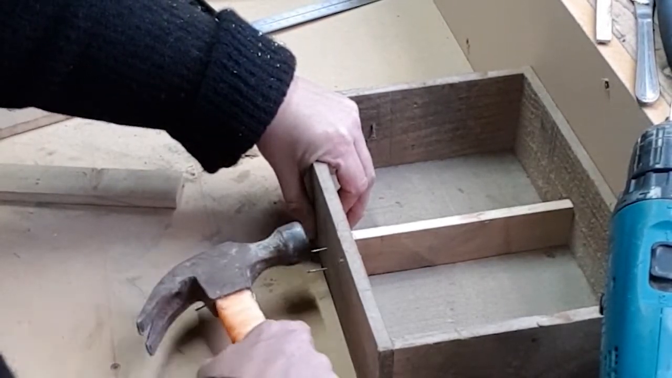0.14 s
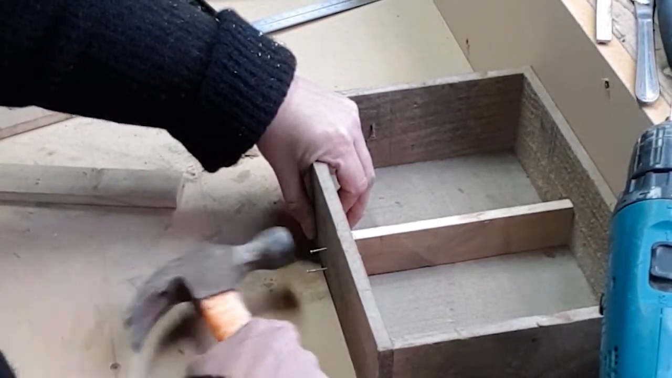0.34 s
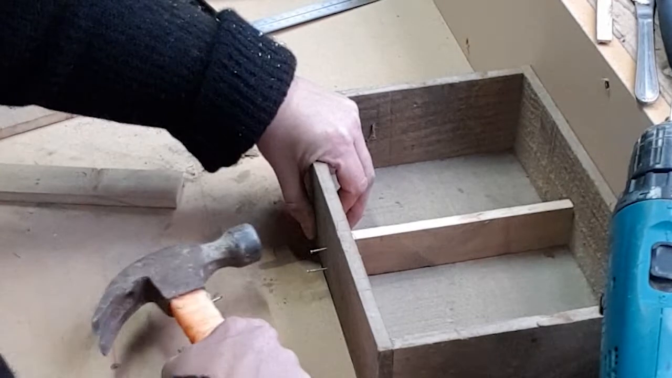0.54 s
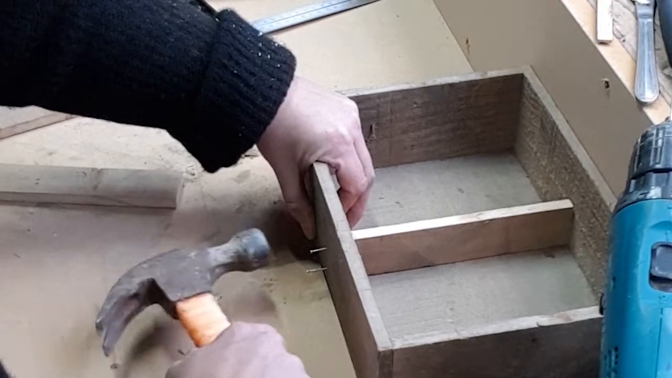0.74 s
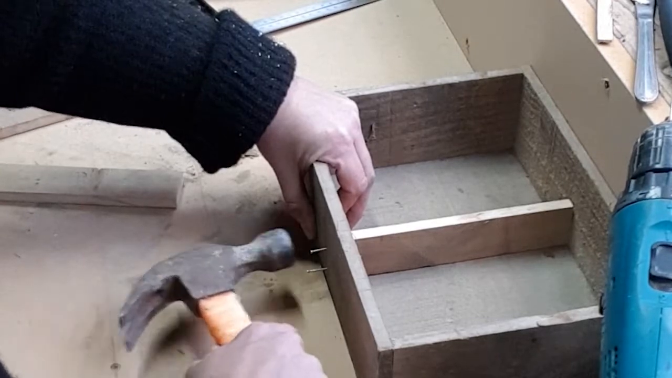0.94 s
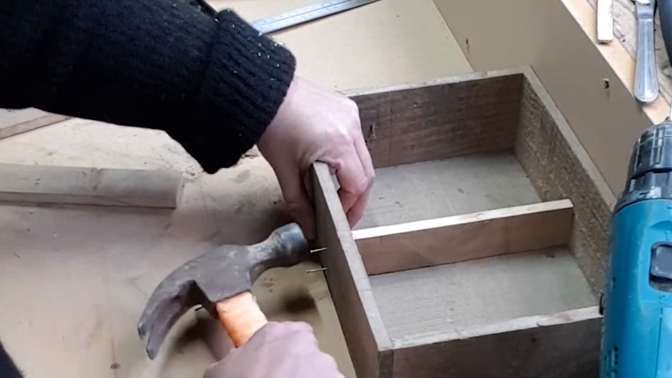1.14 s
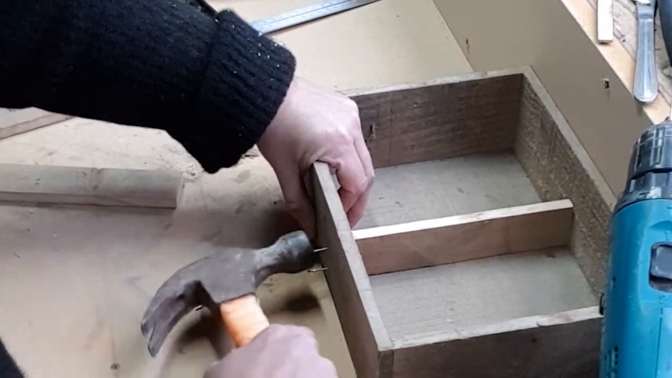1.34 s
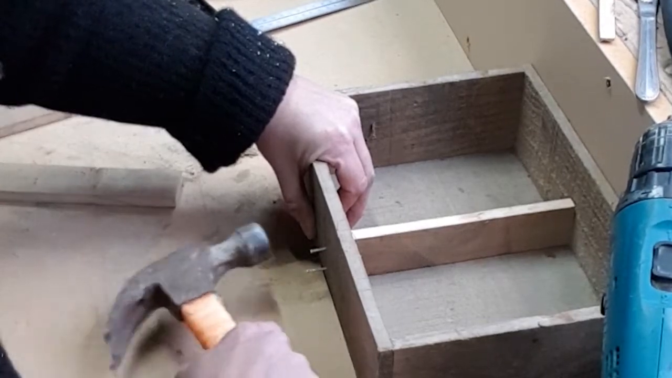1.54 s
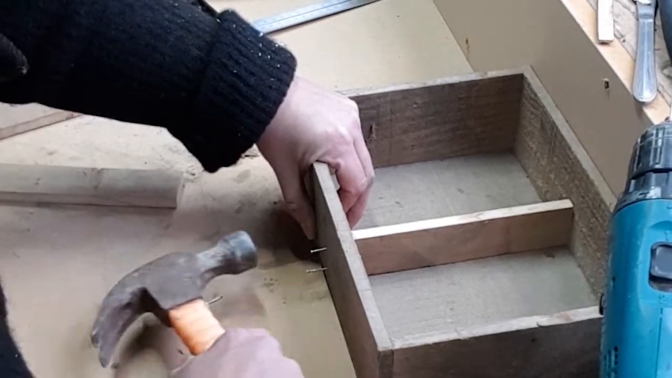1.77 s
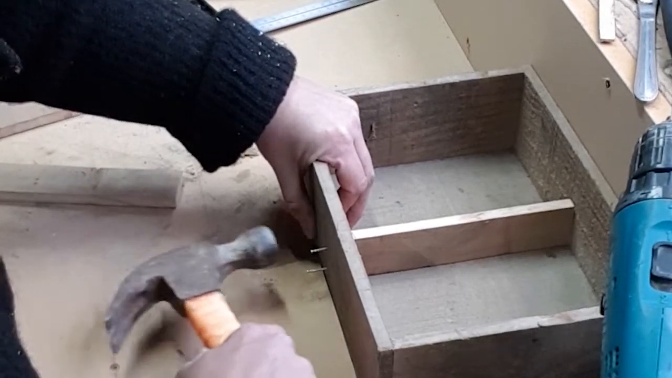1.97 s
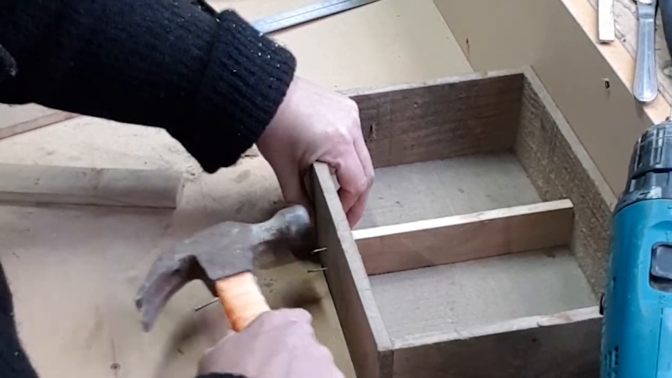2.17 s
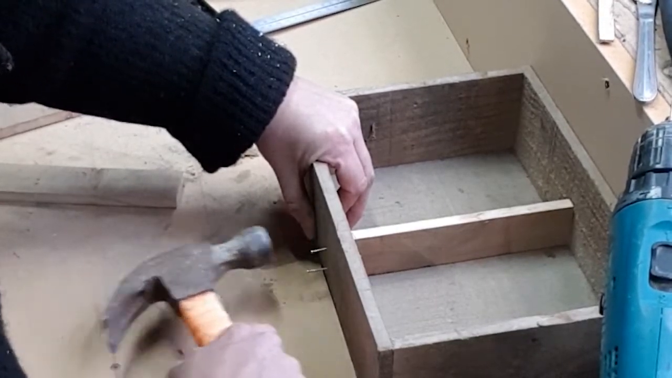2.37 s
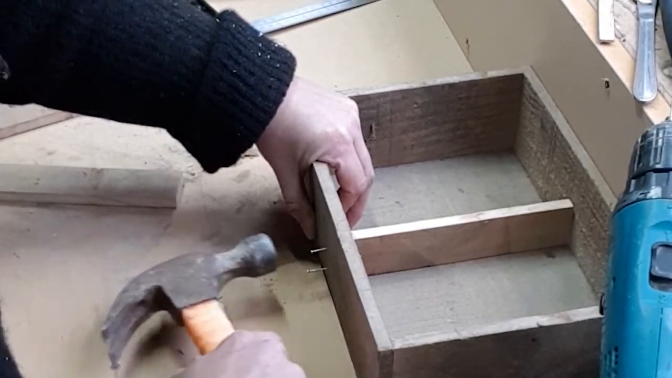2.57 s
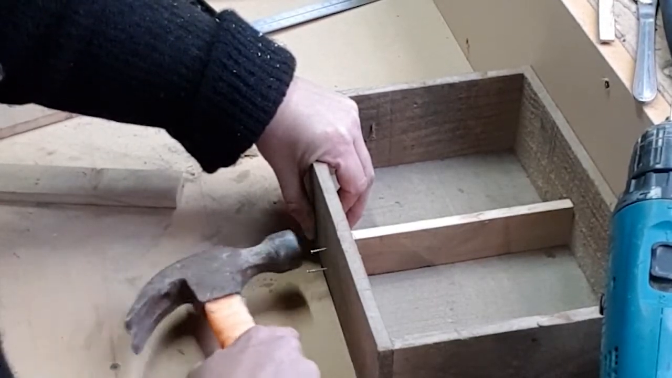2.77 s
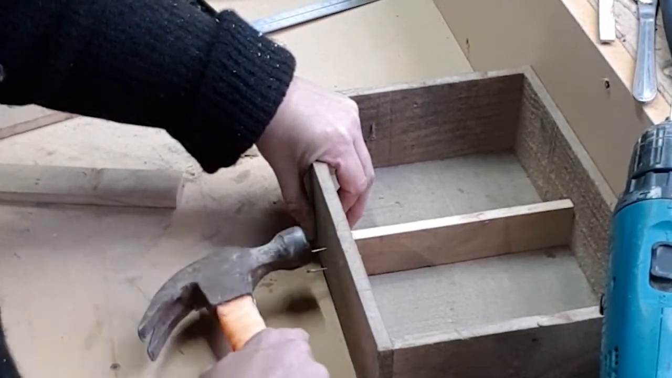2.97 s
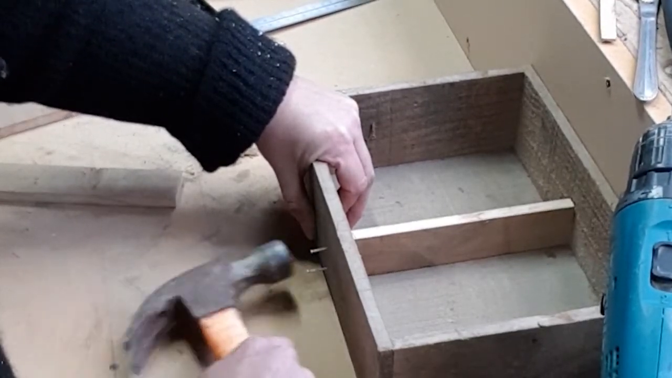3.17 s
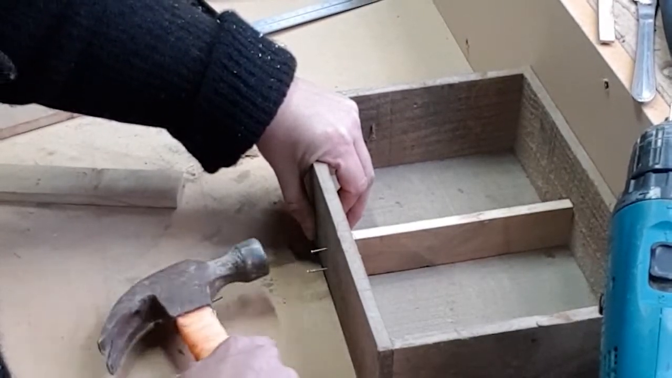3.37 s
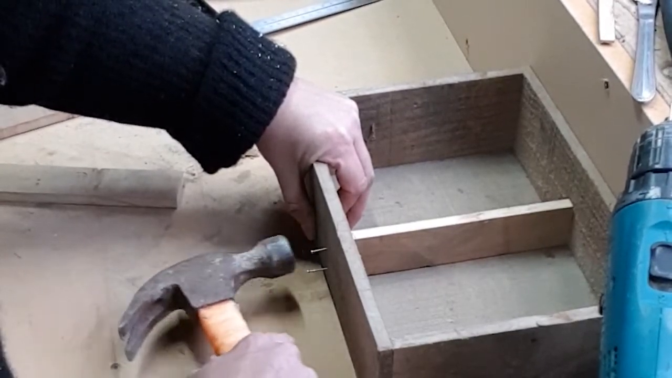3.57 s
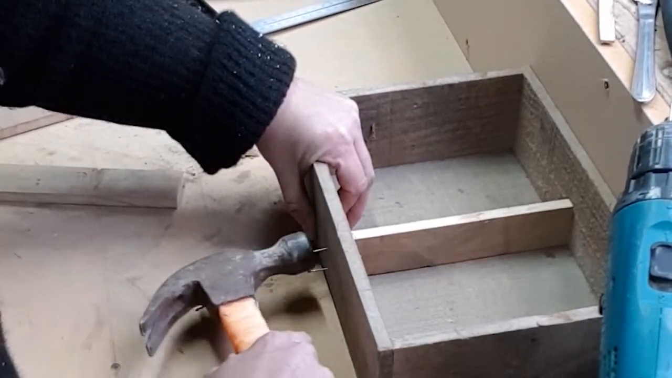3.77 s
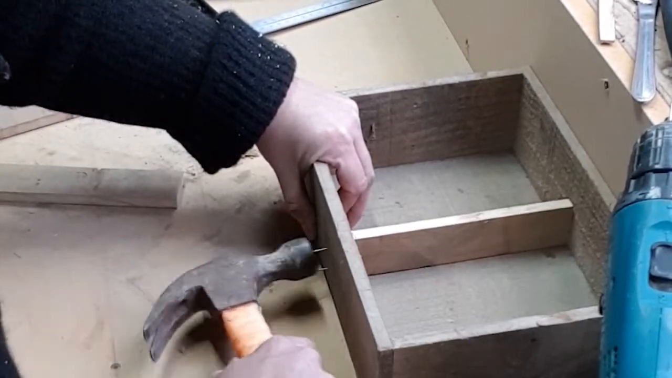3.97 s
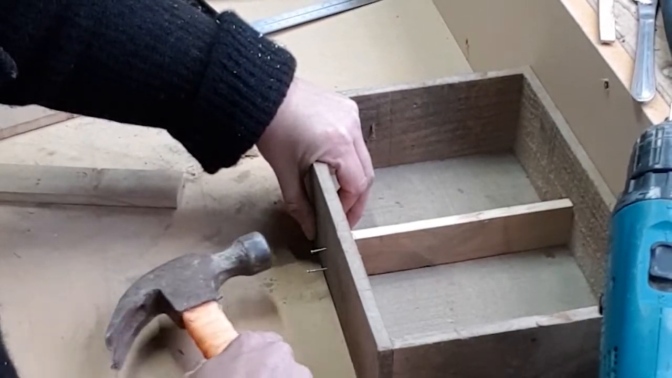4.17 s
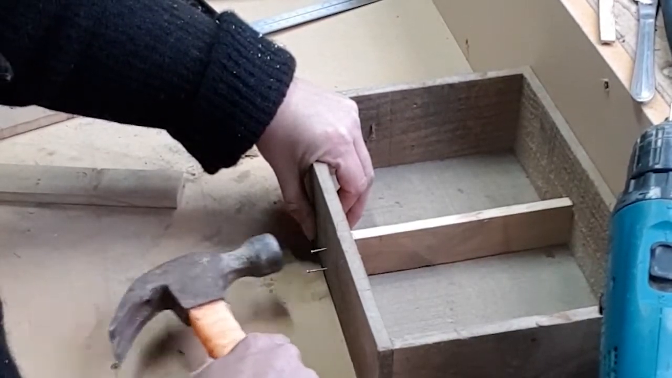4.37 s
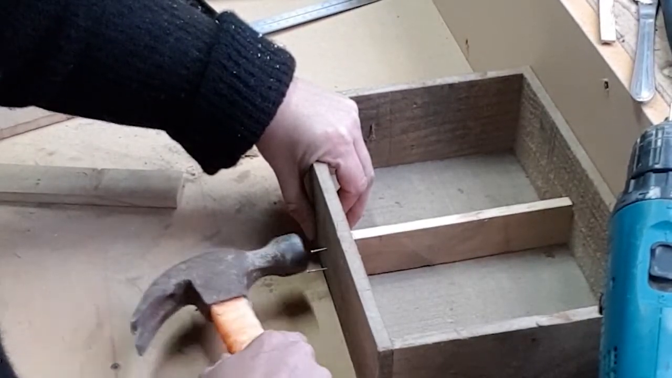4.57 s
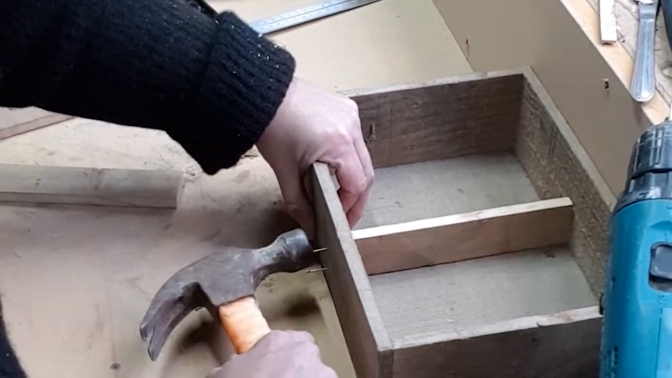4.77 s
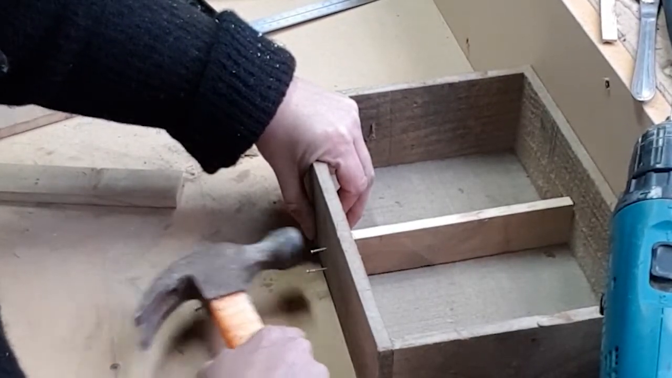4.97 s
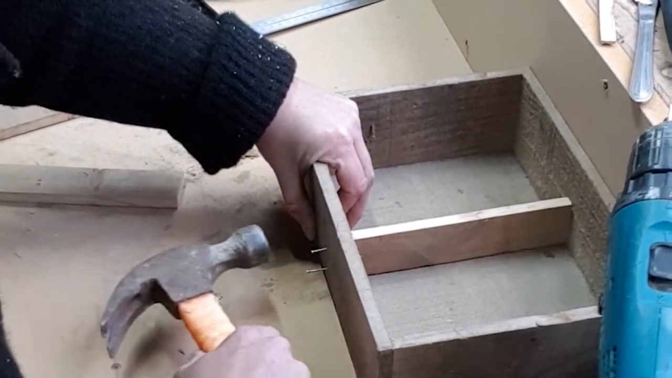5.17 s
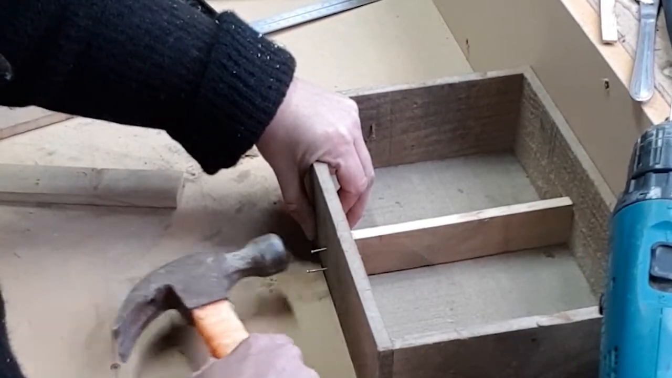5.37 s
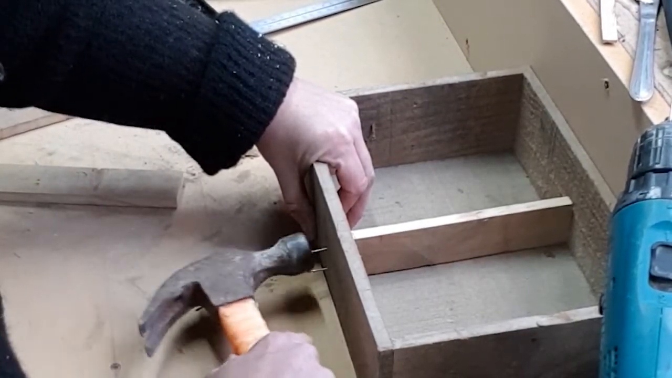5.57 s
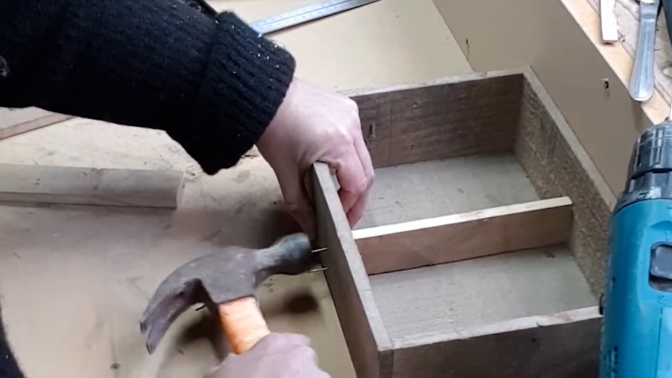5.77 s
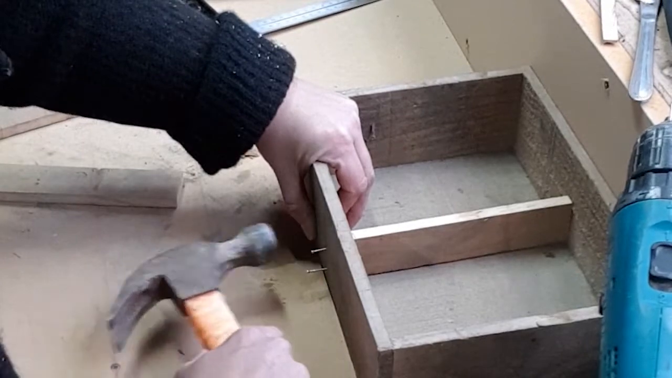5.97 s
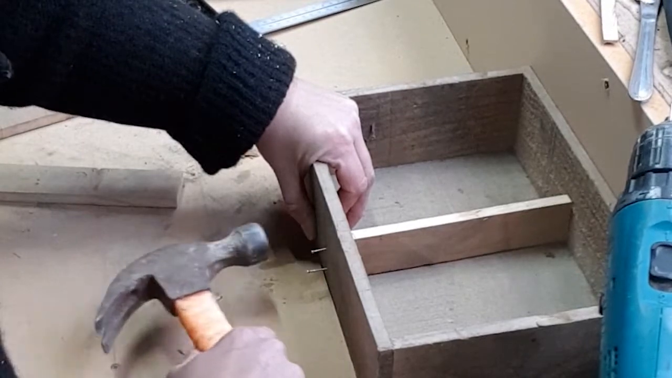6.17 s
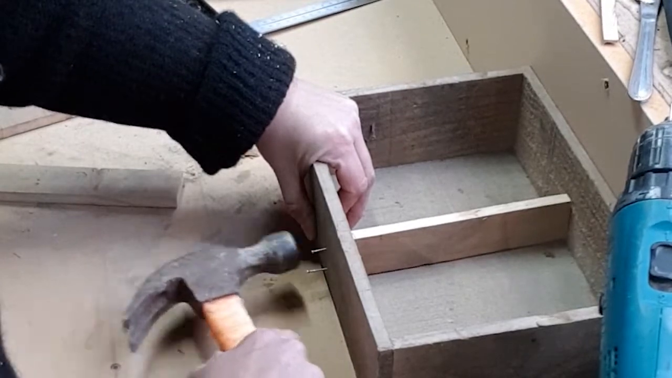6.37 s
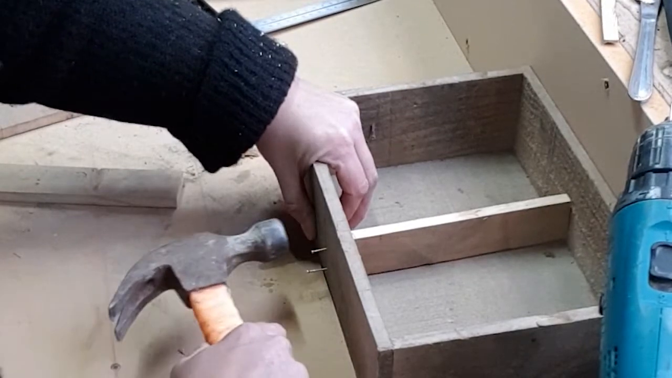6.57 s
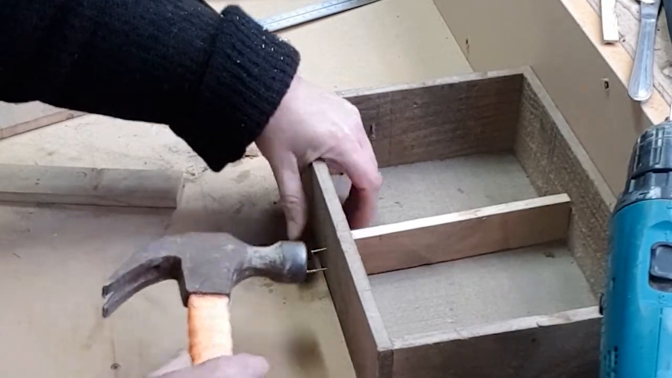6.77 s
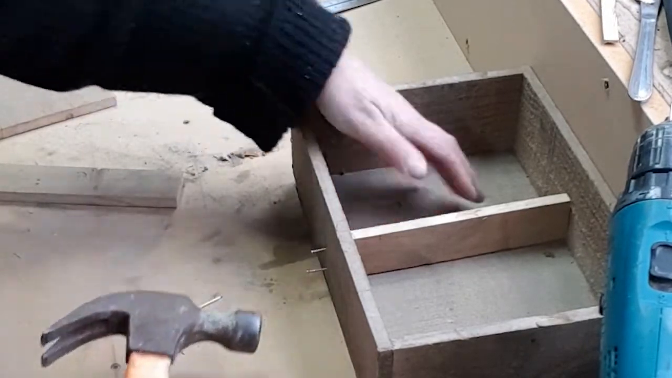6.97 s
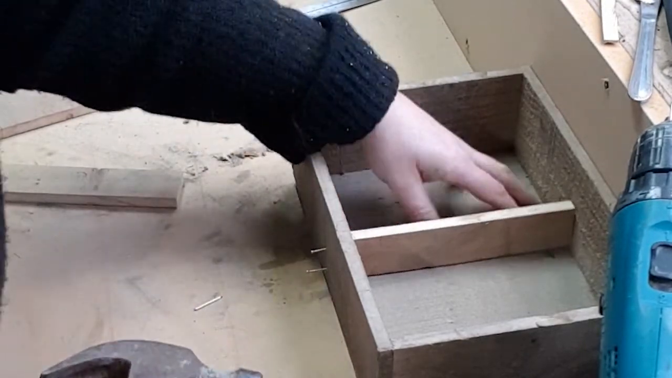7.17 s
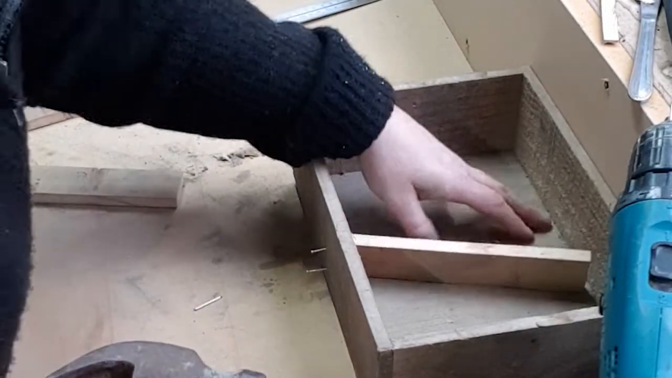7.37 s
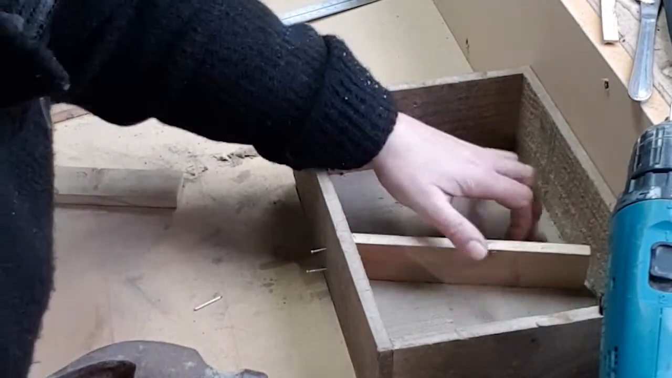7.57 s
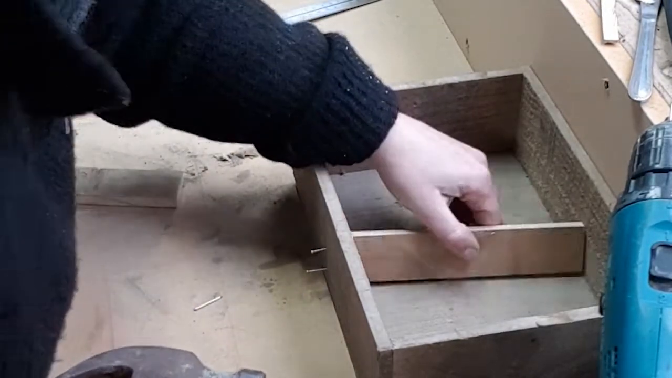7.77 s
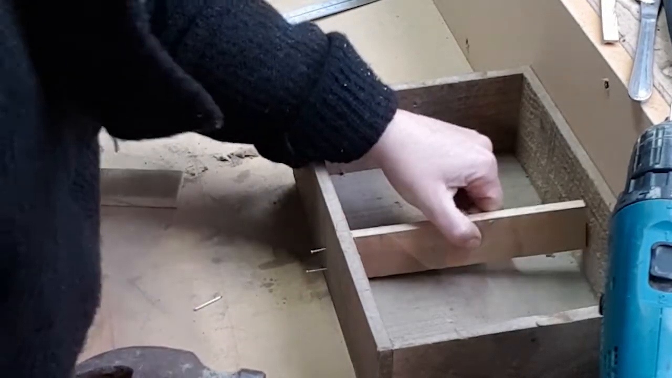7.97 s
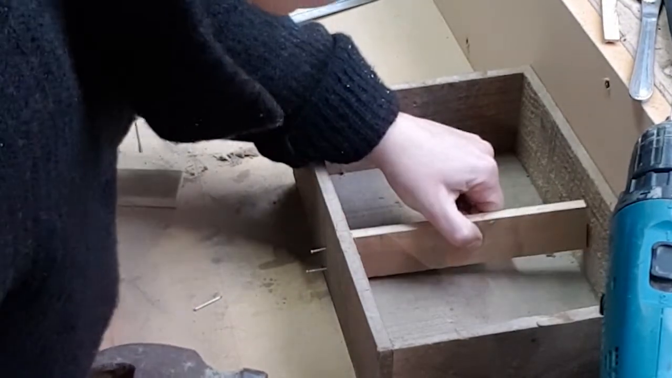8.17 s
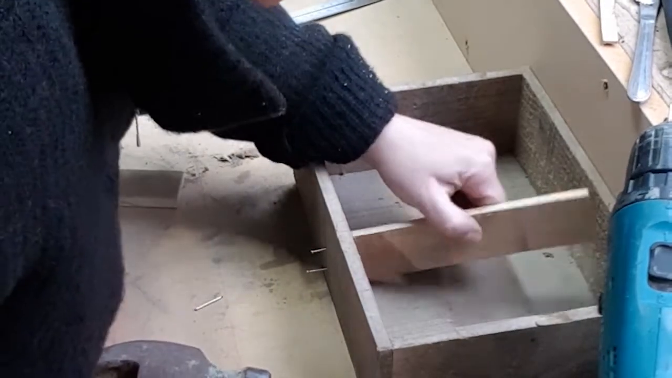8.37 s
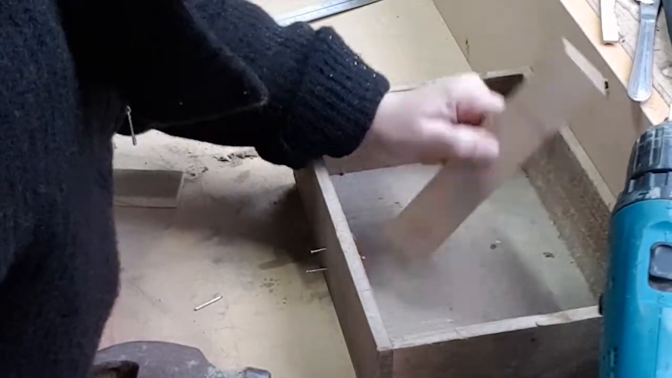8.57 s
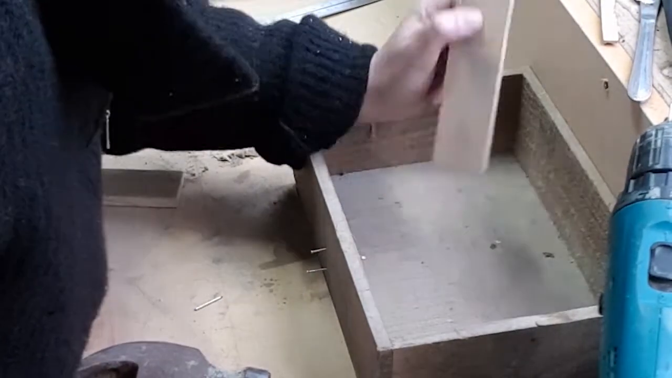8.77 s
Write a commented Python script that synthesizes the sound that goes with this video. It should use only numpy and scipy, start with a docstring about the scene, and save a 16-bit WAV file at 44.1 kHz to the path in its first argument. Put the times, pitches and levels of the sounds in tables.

```python
"""Small workshop: a claw hammer drives nails into the wall of a wooden box on a bench, about four blows a second.
Blows are dying modes of wall, bench and steel plus shaped noise for clatter and tick; decaying noise is the room.
Then the hammer is laid down and a hand shifts a loose slat: damped sine knocks, noise ticks, grainy rubbing.
The recorder's gain climbs once loud sound has ceased and lifts the hum, a drifting low noise."""
import sys
import numpy as np
from scipy import signal
from scipy.fft import rfft, irfft, next_fast_len
from scipy.io import wavfile
from scipy.ndimage import uniform_filter1d

SR = 44100
rng = np.random.default_rng(int(sys.argv[2]) if len(sys.argv) > 2 else 0)


def file_out(sig):
    """Save sig as 16-bit WAV at sys.argv[1]."""
    # one column per channel
    cols = np.atleast_2d(sig).T
    # limit, then scale
    lim = np.clip(cols, -1, 1)
    pcm = np.round(lim * 32767).astype(np.int16)
    wavfile.write(sys.argv[1], SR, pcm)


N = 388962
LEAD = SR // 2  # samples mixed before time zero
BURST = 8192  # samples per noise burst


def gain_of(db):
    """Decibels to amplitude."""
    return 10 ** (np.asarray(db) / 20)


def read(points, hz):
    """Interpolates a (frequency, value) table over log frequency."""
    f, value = np.transpose(points)
    return np.interp(np.log(hz + 1), np.log(f + 1), value)


def add(mix, s, sound):
    """Mixes a two-channel sound in at s seconds, after the lead."""
    part = mix[:, LEAD + round(s * SR):][:, :sound.shape[1]]
    part += sound[:, :part.shape[1]]


def noise(size, colour_db, likeness):
    """Two channels of coloured noise, joint rms 1, correlated per frequency by likeness."""
    hz = np.fft.rfftfreq(size, 1 / SR)
    a, b = rfft(rng.standard_normal((2, size)))
    c = np.clip(read(likeness, hz), -1, 1)
    pair = np.array([a, c * a + np.sqrt(1 - c ** 2) * b])
    x = irfft(pair * gain_of(read(colour_db, hz)), size)
    return x / np.sqrt(np.mean(x ** 2))


def rings(modes, rise_cycles, apart_rad):
    """Complex dying modes (channel, mode, time): exponential swell, random phase offset between ports."""
    hz, db, t60_s = np.transpose(modes)[:, :, None]
    t = np.arange(0, min(t60_s.max(), .75), 1 / SR)
    swell = 1 - np.exp(-t * hz / rise_cycles)
    ring = gain_of(db - 60 * t / t60_s) * swell * 1j * np.exp(2j * np.pi * hz * t)
    shift = np.exp(1j * apart_rad * rng.standard_normal((len(modes), 1)) / 2)
    return np.array([ring * shift, ring / shift])


def click(colour_db, envelope):
    """One smooth coloured click with the energy of a noise burst under the envelope."""
    impulse = irfft(gain_of(read(colour_db, np.fft.rfftfreq(1024, 1 / SR))))
    x = np.roll(impulse, 256)[:768] * signal.windows.tukey(768, .3)
    return np.array([x, x]) * np.linalg.norm(envelope) / np.linalg.norm(x)


# tone shift over the blows, dull low steel and longer ring near 1, 1.2 and 2.9 kHz: (time [s], shift [0-1])
TONE_SHIFT = [(0, 0.0), (2, 0.03), (4.4, 0.9), (6.3, 0.85)]
# relative to the wall knock at squareness 0
THUD_DB, LOW_STEEL_DB, HIGH_STEEL_DB, TICK_DB = 2, -0.04, 0, 1.5
THUD_SHARE, TICK_SHARE = 0.79, 0.94  # share of squareness reaching bench and tick
DULLING_DB = -5.5  # low steel, at shift 1


def blow_levels(s, wall_db, square_db):
    """(s, wall, bench, low steel, high steel, tick): square blows ring more steel, tone shift dulls low steel."""
    shift = np.interp(s, *np.transpose(TONE_SHIFT))
    bench_db = wall_db + THUD_DB + THUD_SHARE * square_db
    low_steel_db = wall_db + LOW_STEEL_DB + square_db + DULLING_DB * shift
    high_steel_db = wall_db + HIGH_STEEL_DB + square_db
    tick_db = wall_db + TICK_DB + TICK_SHARE * square_db
    return s, wall_db, bench_db, low_steel_db, high_steel_db, tick_db


# arrival at the two ports
PORT_LAG_S = 2.4e-5


def at_ports(x):
    """Left port hears the hammer later and softer; the level split shrinks toward the treble."""
    size = x.shape[-1]
    hz = np.fft.rfftfreq(size, 1 / SR)
    lag = np.exp(-2j * np.pi * hz * PORT_LAG_S * np.array([[1], [0]]))
    split_db = read([(1000, 1.0), (8000, .1)], hz) * np.array([[-1], [1]])
    return irfft(rfft(x) * lag * gain_of(split_db), size)


# hammer blows: (time [s], box wall knock [dB], squareness on the nail [dB, 0 = dead on])
BLOWS = [(-.198, -10, -4.5), (0.047, -12, -0.5), (0.3, -13, 0.5), (0.546, -12.5, -1.5), (0.789, -12.5, -2),
         (1.032, -12, -2.5), (1.277, -12, -1.5), (1.533, -12.5, -1.5), (1.785, -12.5, -1),
         (2.359, -12.5, -3.5), (2.633, -12.5, -2.5), (2.872, -12.5, -2), (3.142, -13.5, -5.5),
         (3.4, -12.5, -4), (3.645, -13.5, -4), (3.91, -12.5, -2.5), (4.167, -12, -3), (4.419, -11, -3.5),
         (4.67, -12, -3.5), (4.919, -12, -2), (5.177, -11.5, -3), (5.446, -12.5, -2.5), (5.707, -13, -1.5),
         (5.947, -13, -2.5), (6.213, -13, -2.5)]
# a blow slips, grazes the nail head, then lands on wood:
# (time [s], wall [dB], bench [dB], low steel [dB], high steel [dB], tick [dB])
SLIP = [(2.0315, -28.5, -22.5, -41.5, -41, -26), (2.0505, -14.5, -14.5, -26.5, -27.5, -26)]
# modes of bench, box wall, steel, and the long ring: (frequency [Hz], level [dB], t60 [s])
BENCH_MODES = [(90.2, -10, 0.36), (122.4, -3, 0.09), (144.4, 3, 0.12), (153.5, 7, 0.083), (202, -15, 0.032),
               (214, 1, 0.12), (243.6, 2, 0.11), (163.05, -25, 1.4)]
WALL_MODES = [(478.3, -6.5, 0.1), (516, 2.5, 0.02), (527, -7.5, 0.071), (566.7, -6, 0.04),
              (595, -9.5, 0.011), (878, -8.5, 0.0083), (869.4, -7, 0.052), (944, 5, 0.016),
              (1158, -10, 0.1), (1173, -8.5, .04), (1315, -11, 0.018)]
LOW_STEEL_MODES = [(1854, 8, 0.011), (1920, 2.5, 0.0073), (2175, 12.5, 0.016), (2427, -2.5, 0.011)]
HIGH_STEEL_MODES = [(2703, 11, 0.014), (2944, 4.5, 0.018), (3418, 7, 0.016), (3717, 2.5, 0.023),
                    (4347, -2.5, 0.028), (4894, -9, 0.0086)]
LONG_RING_MODES = [(989, -2.5, .04), (1212, 1, 0.042), (2843, 0.5, 0.054), (2770, -4.5, 0.014),
                   (2960, -27.5, 0.26)]
# colours of crowded wood modes, steel tick, and room-filling thud: (frequency [Hz], level [dB])
CLATTER_COLOUR = [(200, -51.5), (300, -24.5), (500, -2.5), (700, -0.5), (1000, -1.5), (1400, -9),
                  (1650, -8), (2300, -8), (3500, -19), (5500, -34)]
TICK_COLOUR = [(1500, -27.5), (3000, -4.5), (5000, -8), (6800, -16), (8000, -11.5), (10000, -19),
               (13000, -23.5), (16000, -42.5)]
THUMP_COLOUR = [(60, -25), (90, -2.5), (170, 1.5), (260, -4), (380, -21), (1000, -50)]
THUMP_DB, RATTLE_DB = 11.5, -3
LONG_RING_DB, LONG_RING_GROWTH_DB = -20, 19.5  # re wall at shift 0, growth to shift 1
SENT_DB = [-1.5, -4, -3, -3, -1.5]  # to the room: wall, bench, low steel, high steel, long ring


def hammer(mix_size):
    """Blows ring wall, bench and steel with clatter and tick; returns (near, far), far bursts being plain clicks."""
    parts = [rings(WALL_MODES, rise_cycles=0.4, apart_rad=0.45),
             rings(BENCH_MODES, rise_cycles=0.97, apart_rad=0.12),
             rings(LOW_STEEL_MODES, rise_cycles=2.4, apart_rad=3.34),
             rings(HIGH_STEEL_MODES, rise_cycles=3.8, apart_rad=1.17),
             rings(LONG_RING_MODES, rise_cycles=2.7, apart_rad=0.54)]
    out, t = np.zeros((2, 2, mix_size)), np.arange(BURST) / SR
    near, far = out
    rattle_decay = gain_of(-60 * t / 0.035) + gain_of(-13.5 - 60 * t / 0.25)
    rattle = (1 - np.exp(-t / 0.0012)) * rattle_decay
    tick_decay = (gain_of(2.5 - 60 * t / 0.0052) + gain_of(-7.5 - 60 * t / 0.022)
                  + gain_of(-15.5 - 60 * t / 0.11))
    tick = (1 - np.exp(-t / 0.00058)) * tick_decay
    wood_likeness = [(300, 1.0), (600, 0.38), (1200, .3), (3000, 0.67)]
    steel_likeness = [(2000, 1.0), (12000, 0.7)]
    boards = noise(BURST, CLATTER_COLOUR, wood_likeness)  # same boards answer every blow
    far_wood = click(CLATTER_COLOUR, rattle)
    far_steel = click(TICK_COLOUR, tick)
    far_thud = click(THUMP_COLOUR, gain_of(THUMP_DB))
    click_peak_s = 256 / SR
    for s, *part_db, tick_db in [blow_levels(*row) for row in BLOWS] + list(SLIP):
        wall_db, bench_db = part_db[:2]
        shift = np.interp(s, *np.transpose(TONE_SHIFT))
        long_ring_db = wall_db + LONG_RING_DB + LONG_RING_GROWTH_DB * shift
        for ring, level_db, sent_db in zip(parts, part_db + [long_ring_db], SENT_DB):
            wobble, turn = rng.standard_normal((2, ring.shape[1]))  # per mode
            weights = gain_of(level_db + 1.4 * wobble) * np.exp(.2j * turn)
            sound = (weights @ ring).real
            add(near, s, sound)
            add(far, s, gain_of(sent_db) * sound)
        clicks = gain_of(wall_db + 2.5) * far_wood + gain_of(tick_db + 1.0) * far_steel
        add(far, s - click_peak_s, clicks + gain_of(bench_db) * far_thud)
        clatter = boards + 0.92 * noise(BURST, CLATTER_COLOUR, wood_likeness)
        add(near, s, gain_of(wall_db + RATTLE_DB) * rattle * clatter)
        add(near, s, gain_of(tick_db) * tick * noise(BURST, TICK_COLOUR, steel_likeness))
    return at_ports(out)


# room decay: (frequency [Hz], t60 [s])
ROOM_T60 = [(60, 0.99), (150, 0.72), (400, 0.44), (1000, 0.39), (2500, 0.51), (5000, 0.4), (9000, 0.37),
            (15000, 0.4)]
# room colour: (frequency [Hz], level [dB])
ROOM_COLOUR = [(60, -9), (150, -18.5), (250, -1), (400, -2.5), (1000, -5.5), (2500, -11), (5000, -8),
               (9000, -8), (15000, -11)]
# room left-right likeness: (frequency [Hz], correlation [-1 to 1])
ROOM_LIKENESS = [(100, 0.92), (400, 0.88), (1000, 0.4), (4000, .2)]


def room(x):
    """Dense noise tail with per-band decay; three tails take turns so like blows differ a little."""
    out = np.zeros_like(x)
    turn_rad = np.arange(x.shape[1]) / SR * .45
    for k in range(3):
        flat = noise(SR, [(20, 0.012), (20000, 0)], ROOM_LIKENESS)
        hz, t, z = signal.stft(flat, SR, nperseg=256)
        decay_db = -60 * t / read(ROOM_T60, hz)[:, None] + read(ROOM_COLOUR, hz)[:, None]
        tail = signal.istft(z * gain_of(decay_db), SR, nperseg=256)[1]
        tail *= 1 - np.exp(-(np.arange(tail.shape[1]) / SR / 0.0089) ** 2)  # builds up after first walls
        window = np.sqrt(2 / 3) * np.cos(turn_rad + k * np.pi / 3)  # constant summed power
        out += signal.fftconvolve(x * window, tail / np.sqrt(SR * 0.017), axes=1)[:, :x.shape[1]]
    return out


# room tone colour: (frequency [Hz], relative density [dB per Hz])
HUM_COLOUR = [(20, -7.5), (35, -7), (55, -1.5), (90, -5), (160, -7), (250, -8.5), (350, -11), (850, -11),
              (1300, -18), (1900, -24), (3200, -42), (9000, -47.5), (16000, -58)]
# left-right likeness, hum and handling: (frequency [Hz], correlation [-1 to 1])
LIKENESS = [(60, 0.98), (240, 0.92), (950, 0.1), (3770, -0.19), (15000, -0.19)]
HUM_DB = -55


def hum():
    """Low coloured noise whose level drifts slowly in time-frequency patches."""
    hz, t, z = signal.stft(noise(N + 1024, HUM_COLOUR, LIKENESS), SR, nperseg=1024)
    patches = uniform_filter1d(rng.standard_normal(z.shape[1:]), 6, 0)
    patches = uniform_filter1d(patches, 8, 1)
    drift_db = 1.3 * patches / patches.std()
    x = signal.istft(z * gain_of(drift_db), SR, nperseg=1024)[1][:, :N]
    return gain_of(HUM_DB) * x * gain_of([[-1.1], [1.1]])


# dry ticks of slat and fingers on wood: (time [s], level [dB], centre [Hz])
TICKS = [(6.723, -54, 2820), (7.111, -51, 8100), (7.162, -56, 7000), (7.247, -69, 5000), (7.613, -50, 7800),
         (7.629, -55, 6900), (7.68, -61, 6000), (7.779, -53, 6900), (8.251, -56.5, 8100),
         (8.375, -62, 9600), (8.408, -67, 8200), (8.431, -66, 8200)]
TICK_T60_S = 0.023


def ticks(out, t):
    """Short noise bursts peaked at a centre frequency, exponential decay."""
    for s, db, hz in TICKS:
        colour = [(hz / 4, -10), (hz / 0.98, -6), (hz, 0), (hz * 1.2, -7), (hz * 3, -22)]
        add(out, s, gain_of(db - 60 * t / TICK_T60_S) * noise(BURST, colour, LIKENESS))


# strokes of hand, sleeve and slat, each cut at one BURST: (start [s], length [s], level [dB])
RUBS = [(6.716, 0.12, -65), (7.422, 0.24, -72), (7.565, .1, -64), (7.67, 0.18, -72), (8.241, 0.1, -71.5),
        (8.38, 0.093, -77)]
# rub colour: (frequency [Hz], level [dB])
RUB_COLOUR = [(880, -9), (1500, -2.5), (3750, -12.5), (4500, -14), (4950, -21), (7940, -16.5), (15000, -27)]
RUB_RISE_S, RUB_FADE_DB = 0.013, -7


def rubs(out, t):
    """Friction noise stepped in level by random catches every few ms, fading along the stroke."""
    for s, length, db in RUBS:
        catches = np.minimum(rng.exponential(1, size=41), 3)
        grain = gain_of(3.1 * np.repeat(catches, 200)[:BURST])
        edges = np.clip(np.minimum(t, length - t) / RUB_RISE_S, 0, 1)
        shape = edges * gain_of(db + RUB_FADE_DB * (t / length) ** 2)
        add(out, s, shape * grain * noise(BURST, RUB_COLOUR, LIKENESS))


# hammer laid down, slat knocking the box:
# (time [s], level [dB], pitch [Hz], t60 [s], click re level [dB])
KNOCKS = [(7.083, -17.5, 239, 0.034, -24), (7.116, -24.5, 220, .05, -28), (7.248, -25.5, 356, 0.033, -4),
          (7.632, -31, 328, 0.042, -5), (7.755, -36, 258, 0.12, -5), (8.01, -45, 225, 0.077, -15),
          (8.8155, -22.5, 2230, 0.045, -5)]


def knocks(out, t):
    """Wood on wood: five damped inharmonic sines plus a noise click."""
    partials = [(.62, -10.5), (1, -5), (1.48, -10.5), (2.2, -15.5), (3.6, -30.5)]  # (ratio, dB)
    colour = [(300, 2.5), (700, 3.5), (1400, -4.5), (3000, -20), (12000, -36.0)]
    for s, db, hz, t60_s, click_db in KNOCKS:
        body = sum(gain_of(d) * np.sin(2 * np.pi * hz * k * t) for k, d in partials)
        contact = gain_of(click_db - 60 * t / 0.022) * noise(BURST, colour, LIKENESS)
        rise = 1 - np.exp(-t / 0.0017)
        add(out, s, gain_of(db) * rise * (gain_of(-60 * t / t60_s) * body + contact))


def handling(mix_size):
    """Sums ticks, rubs and knocks, softer on the left."""
    out, t = np.zeros((2, mix_size)), np.arange(BURST) / SR
    ticks(out, t)
    rubs(out, t)
    knocks(out, t)
    return out * gain_of([[-1], [1]])


def scene():
    """Blows and handling near the ports, the room behind them, hum throughout."""
    size = next_fast_len(N + LEAD)
    both = hammer(size) + handling(size)
    # microphone passes little deep bass from blows and handling
    high_pass = signal.butter(4, 80, "high", fs=SR, output="sos")
    near, far = signal.sosfilt(high_pass, both)
    return (near + room(far))[:, LEAD:LEAD + N] + hum()


LOUD_DB, HOLD_S, CLIMB_S, LIFT_DB = -26, .75, 1.07, 10.5
EDGE_HZ = 15900


def record(dry):
    """Gain waits after the last loud block, then climbs; a loud block resets it. Soft clip, low-pass."""
    step = 441
    power = uniform_filter1d((dry ** 2).mean(0), step)[::step]
    power_db = 10 * np.log10(power + 1e-12)
    t = np.arange(len(power_db)) * step / SR
    quiet_s = t - np.maximum.accumulate(t * (power_db > LOUD_DB))
    lift_db = LIFT_DB * np.clip((quiet_s - HOLD_S) / CLIMB_S, 0, 1)
    lifted = dry * gain_of(np.interp(np.arange(N) / SR, t, lift_db))
    clipped = np.clip(np.tanh(lifted / 1.25) * 1.25, -1, 1)
    low_pass = signal.firwin(511, EDGE_HZ, window=("kaiser", 9), fs=SR)
    return signal.oaconvolve(clipped, low_pass[None], "same")


dry = scene()
out = record(dry)
file_out(out)
```